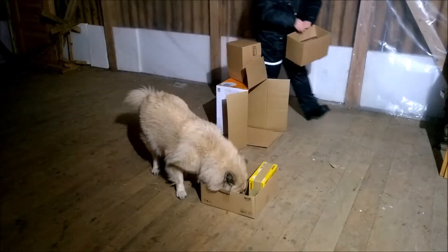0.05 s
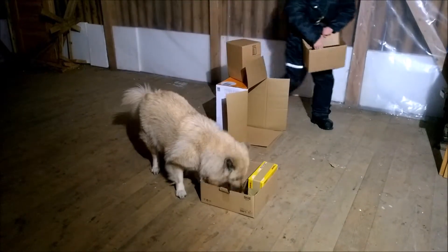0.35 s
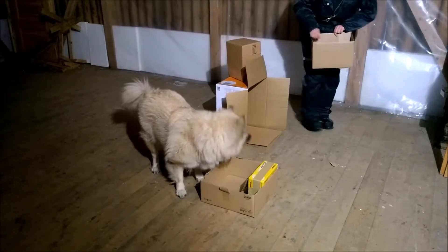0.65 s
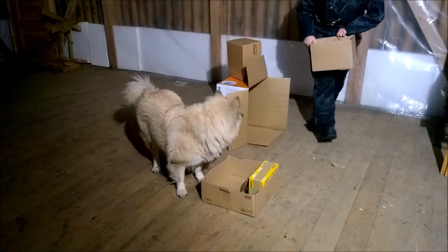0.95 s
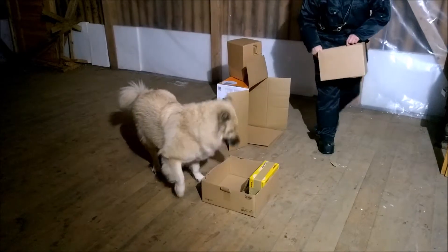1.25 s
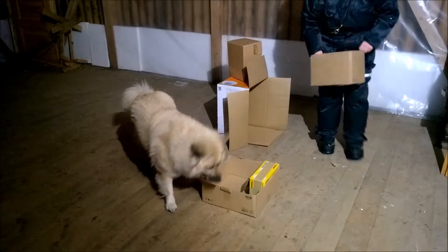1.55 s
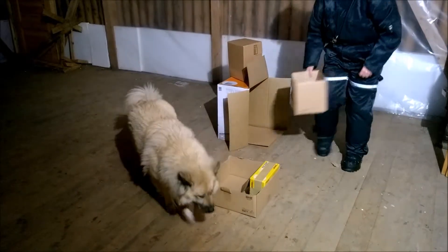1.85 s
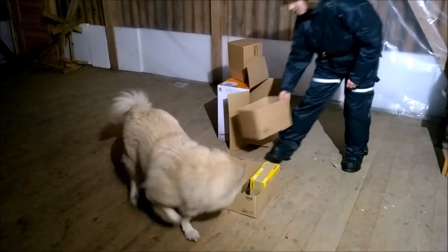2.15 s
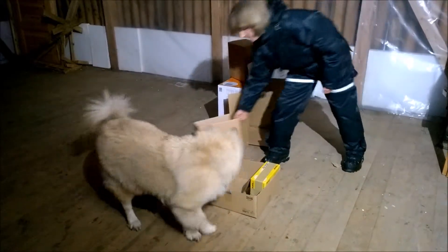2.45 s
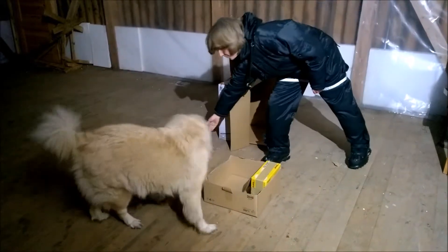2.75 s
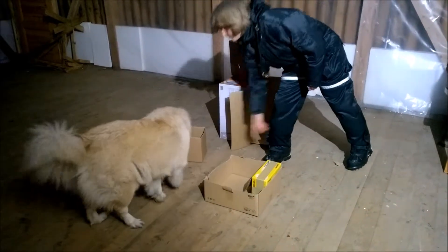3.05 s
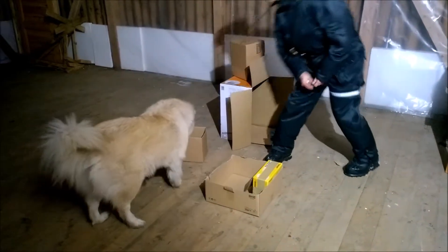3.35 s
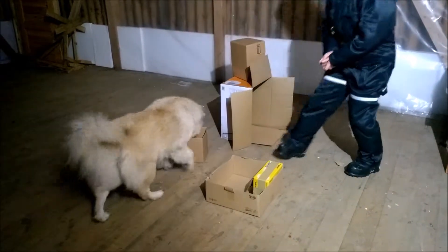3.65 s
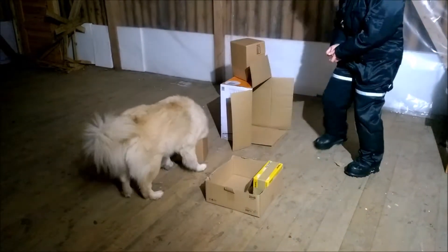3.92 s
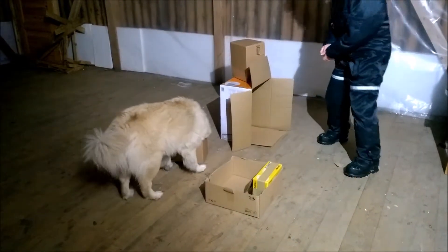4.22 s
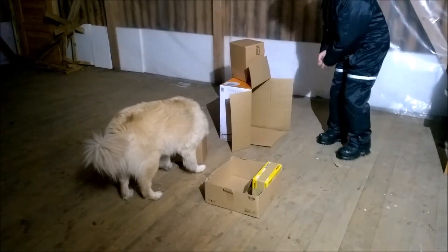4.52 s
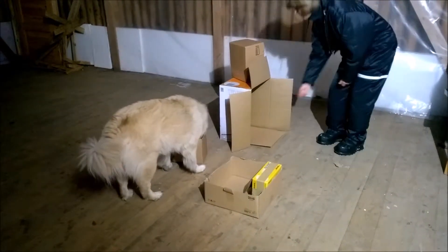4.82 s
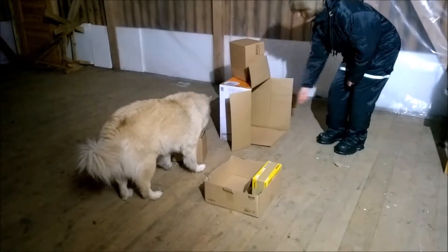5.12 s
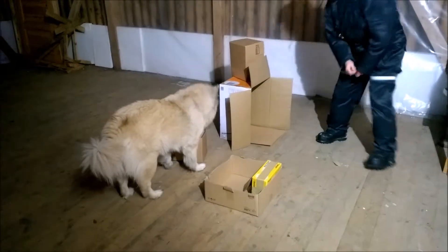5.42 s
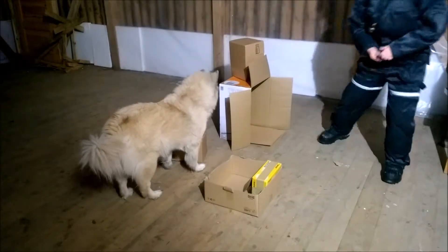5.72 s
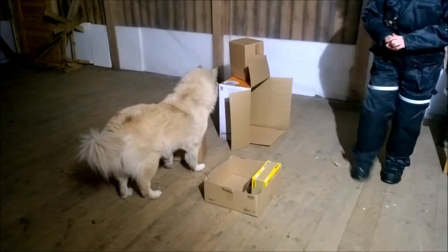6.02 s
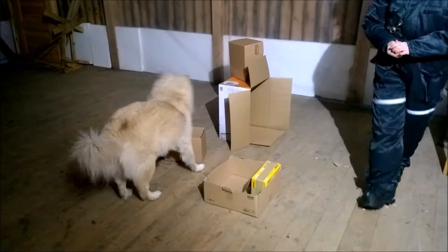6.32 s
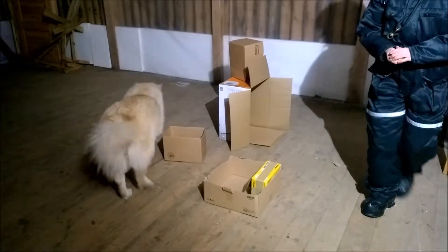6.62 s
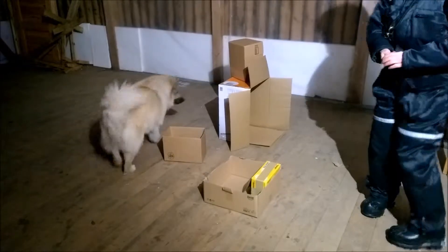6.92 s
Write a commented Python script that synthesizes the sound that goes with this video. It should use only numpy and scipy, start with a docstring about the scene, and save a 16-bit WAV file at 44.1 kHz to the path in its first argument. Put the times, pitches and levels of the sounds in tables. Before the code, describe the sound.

Boots thud on barn planks as a cardboard box bumps, slaps down and skids, with nylon swishing and a dog padding softly.

```python
"""Boots boom on the plank floor of a barn, setting planks and joists swinging, while soles scuff
and nylon work clothes swish. The walker bumps a cardboard box against a stack and tosses it:
it slaps down and skids, sticking and slipping over grit. A dog pads about and nudges it,
claws skating on the cardboard. The wooden room answers every knock."""
import sys
import numpy as np
from scipy import signal
from scipy.fft import rfft, irfft
from scipy.io import wavfile

SR = 44100
rng = np.random.default_rng(int(sys.argv[2]) if len(sys.argv) > 2 else 0)


def output_pcm(signal):
    """Save a mono or channel-first signal as 16-bit PCM at the path in sys.argv[1].

    Samples are clipped to [-1, 1] before scaling.
    """
    pcm = np.clip(np.atleast_2d(signal).T, -1, 1) * 32767
    wavfile.write(sys.argv[1], SR, np.round(pcm).astype(np.int16))


N = 316197
HZ = np.fft.rfftfreq(N, 1 / SR)
T = np.arange(N) / SR
RING = T[:SR]  # the second that follows a blow


def amp(db):
    """Decibels to gain."""
    return 10 ** (np.asarray(db) / 20)


def unit(x):
    """Scales to rms 1."""
    return x / np.sqrt(np.mean(x ** 2) + 1e-20)


def read(points, hz):
    """Reads a curve along a log-frequency axis."""
    f, value = np.transpose(points)
    return np.interp(np.log(hz + 1), np.log(f + 1), value)


def add(mix, s, sound):
    """Lays a sound into the mix at s seconds."""
    part = mix[max(round(s * SR), 0):][:len(sound)]
    part += sound[:len(part)]


def tilt(x, spectrum):
    """A gentle EQ curve."""
    return irfft(rfft(x) * amp(read(spectrum, HZ)), N)


def colour(x, spectrum, size=4096):
    """Causal EQ of energy 1 that keeps attacks sharp."""
    log_gain = np.log(amp(read(spectrum, abs(np.fft.fftfreq(size, 1 / SR)))))
    taps = np.fft.ifft(np.exp(np.conj(signal.hilbert(log_gain)))).real[:size // 2]
    return signal.oaconvolve(x, taps / np.linalg.norm(taps))[:N]


def bandpass(x, edges_hz):
    """Keeps the band between two edges."""
    return signal.sosfilt(signal.butter(2, edges_hz, "bandpass", fs=SR, output="sos"), x)


def grains(per_s, spread_db):
    """Random clicks of uneven size, rms 1."""
    size = amp(spread_db * np.minimum(rng.exponential(1, N), 4))
    return unit(size * rng.choice([-1., 1.], N) * (rng.random(N) < per_s / SR))


def drift(hz):
    """Smooth random wander up to about hz, rms 1."""
    return unit(irfft(rfft(rng.standard_normal(N)) / (1 + (HZ / hz) ** 4), N))


def swell(rise, t60):
    """Envelope of a blow: a smooth attack, then a steady decay."""
    attack = np.sin(np.pi / 2 * np.minimum(RING / rise, 1)) ** 2
    return attack * amp(-60 * np.maximum(RING - rise, 0) / t60)


def mode(hz, rise, t60):
    """One dying vibration."""
    return np.sqrt(2) * swell(rise, t60) * np.sin(2 * np.pi * hz * RING)


def stroke(centre_s, half_s):
    """Envelope of a rub that speeds up and slows down."""
    return np.exp(-np.minimum(((T - centre_s) / half_s) ** 2, 20))


# Colour of the still air: freq_hz, level_db
AIR_EQ = [(12, -31), (20, -4), (40, -5.5), (144, -20.5), (232, -19), (259, -21.5), (439, -28.5),
          (788, -31.5), (1580, -38), (1720, -38), (1870, -39.5), (2840, -40), (15500, -56)]
# How alike its two sides are: freq_hz, likeness (0-1)
AIR_LIKENESS = [(30, 0.84), (200, 0.52), (500, 1), (1200, 0.12), (15000, 0.11)]
def room_tone(level_db=-50):
    """The quiet of the barn: a restless rumble, much alike on both sides, under a thin, wide hiss."""
    right, apart = rfft(rng.standard_normal((2, N)))
    likeness = np.clip(read(AIR_LIKENESS, HZ), 0, 1)
    left = likeness * right + np.sqrt(1 - likeness ** 2) * apart
    pair = irfft(np.array([left, right]) * amp(read(AIR_EQ, HZ)), N)
    return amp(level_db) * unit(pair) * amp(0.35 * drift(hz=3.8))


# Decay of the wooden room: freq_hz, t60_s
BARN_DECAY = [(60, 5), (250, 0.4), (1000, 0.92), (4000, 0.36), (8000, 0.4), (15000, 0.18)]
def echoes(per_s=3000):
    """A random stereo reverb tail of energy 1 a side, each band dying at its own speed."""
    taps = rng.choice([-1., 1.], (2, SR)) * (rng.random((2, SR)) < per_s / SR)
    taps *= np.clip((RING - .001) / 0.003, 0, 1)
    taps *= 1 + 4.0 * np.exp(-RING / 0.069)  # early echoes are the strongest
    hz, t, bands = signal.stft(taps, SR, nperseg=256)
    t60 = read(BARN_DECAY, hz)[:, None]
    tail = signal.istft(bands * amp(-60 * t / t60) / np.sqrt(t60), SR, nperseg=256)[1]
    return tail / np.linalg.norm(tail, axis=1, keepdims=True)


# EQ of the reverb send: freq_hz, gain_db
SEND_EQ = [(30, -2), (110, -10.5), (250, -4.5), (600, 1.5), (1500, -2.5), (5000, -0.5), (14000, 3.5)]
# Direct sound on the shaded left side: freq_hz, gain_db
SHADE_EQ = [(30, -6), (300, -1.5), (900, 2), (2000, -6.5), (15000, 1.5)]
def barn(direct, send, lag_samples=8, shift_hz=3.3):
    """Direct sound reaches the left early but shaded; two tails crossfade, as if things moved about."""
    sent = tilt(send, SEND_EQ)
    turn = 2 * np.pi * shift_hz * T
    wet = sum(signal.oaconvolve((sent * share)[None], echoes(), axes=1)[:, :N]
              for share in (np.cos(turn), np.sin(turn)))
    left = amp(0.5) * tilt(direct, SHADE_EQ)
    right = np.pad(direct, (lag_samples, 0))[:N]
    return np.array([left, right]) + wet


# Nylon brushing past itself: centre_s, half_length_s, level_db
NYLON_SWISHES = [(.49, 0.13, -57), (0.734, 0.023, -56), (0.871, 0.087, -56), (1.147, 0.017, -49.5),
                 (1.286, 0.068, -52), (1.664, 0.024, -51), (1.944, 0.053, -52), (2.187, 0.047, -56),
                 (2.676, 0.04, -54), (3.068, 0.024, -50), (4.206, 0.033, -58.5), (4.395, 0.022, -63),
                 (6.686, 0.079, -56), (7.01, .07, -55)]
# Fader ride of the jacket's rustle: time_s, level_db
RUSTLE_RIDE = [(0, -58), (.45, -61.5), (1.4, -62), (1.58, -59.5), (3.5, -61.5), (3.9, -73), (4.12, -64),
               (5.1, -71), (5.3, -64), (5.9, -63.5), (6.2, -56.5), (7.17, -61.5)]
# Colours of swish and jacket: freq_hz, level_db
SWISH_EQ = [(1000, -36), (3000, 1), (4600, 4.5), (5700, 0), (7500, 3), (11500, -2), (13500, -7.5),
            (16000, -19)]
JACKET_EQ = [(300, 2.5), (900, -2), (2700, 4), (3500, -0.5), (4600, 3.5), (5700, -5), (8000, -11.5),
             (12000, -17), (16000, -56)]
def clothes():
    """Fine grains from woven nylon: bright swishes at the strides over the jacket's soft rustle."""
    legs, sleeves = (grains(per_s=16000, spread_db=-0.5) * amp(2.0 * drift(hz=27)) for _ in range(2))
    strides = sum(amp(db) * stroke(s, half) for s, half, db in NYLON_SWISHES)
    rustle = amp(np.interp(T, *np.transpose(RUSTLE_RIDE)))
    return colour(legs * strides, SWISH_EQ) + amp(-0.5) * colour(sleeves * rustle, JACKET_EQ)


# Claw scratches: start_s, decay_s, level_db
SCRATCHES = [(6.449, .006, -53), (6.462, .006, -40.5), (6.468, 0.012, -50)]
# Their sheen: freq_hz, level_db
CLAW_EQ = [(3000, -25), (8000, -27), (11000, 4), (14500, 0), (16000, -5)]
def claws():
    """The dog's claws skate on cardboard in thin, very bright scratches."""
    level = np.zeros(N)
    for s, decay, db in SCRATCHES:
        add(level, s, amp(db) * np.exp(-RING / decay))
    return colour(level * rng.standard_normal(N), CLAW_EQ)


# Soles and paws dragging: centre_s, half_length_s, level_db, rasp_hz, rasp_share (0-1)
DRAGS = [(.225, 0.023, -50.5, 1450, 0.6), (.528, 0.023, -45.5, 430, 0.99), (.61, 0.044, -59, 2780, 0.9),
         (.747, 0.021, -53.5, 1100, 0.65), (.836, 0.083, -58, 1600, 0.18),
         (1.237, 0.077, -51.5, 1450, 0.58), (1.305, 0.081, -52.5, 4340, 0.98),
         (1.665, 0.028, -45.5, 905, 0.84), (2.21, 0.093, -55, 864, 0.7), (2.668, 0.09, -58, 3850, 0.5),
         (3.154, 0.016, -52, 3100, 0.98), (3.635, 0.031, -50.5, 2420, 0.6), (3.75, 0.071, -60, 1090, 0.52),
         (4.058, 0.035, -59.5, 1110, 0.43), (5.51, 0.029, -59, 2900, 0.1), (4.695, 0.049, -62, 2500, 0.05),
         (6.21, 0.1, -61, 1100, 0.6), (6.457, 0.02, -48.5, 1680, 0.05), (6.555, .031, -59.5, 1110, 1),
         (6.716, 0.17, -60.5, 2600, 0.58), (6.837, .03, -58, 2400, 0.33), (6.955, 0.043, -59, 860, 0.5)]
# Colour of the broad rub: freq_hz, level_db
RUB_EQ = [(150, -16.5), (400, 1.5), (900, 1), (1800, -0.5), (3000, -4), (3600, -1), (4600, -4.5),
          (5600, -16), (8000, -19.5), (15000, -52)]
def scuffs(rasp_q=3.2, sole_half_s=0.094, sole_rasp_hz=480, sole_share=0.23):
    """Coarse grains from drags on dusty wood, each part broad rub, part its own narrow rasp."""
    # every sole also drags as it comes down, more so under weight
    soles = [(s + roll, sole_half_s, -37 + 0.77 * sole_db, sole_rasp_hz, sole_share)
             for s, roll, _, sole_db, *_ in BOOT_STEPS]
    dust, catches = (grains(per_s=5000, spread_db=1.0) * amp(4.2 * drift(hz=55)) for _ in range(2))
    rub, rasps = np.zeros((2, N))
    for s, half, db, hz, share in [*DRAGS, *soles]:
        level = amp(db) * stroke(s, half)
        edges_hz = hz * np.exp(np.array([-.5, .5]) / rasp_q)
        rub += np.sqrt(1 - share) * level
        rasps += np.sqrt(share) * level * unit(bandpass(catches, edges_hz))
    return rasps + colour(dust * rub, RUB_EQ)


# How each lands on the floor: rise_s, sway_db, overtone_db, thud_db
HEEL, SOLE, PAW = (.008, -15.5, -5, -5.5), (.016, 0, -14, -2.5), (.012, -9, -14.5, 0)
# Soft paw falls and shifts of weight: start_s, level_db, pitch_hz, thud_db
PAW_FALLS = [(0.031, -50, 71, -4), (0.497, -50.5, 150.7, 4.5), (.78, -58, 71.4, 12.5),
             (1.449, -50.5, 76.5, -6), (1.999, -38, 62.6, -11), (3.2, -46.5, 58.8, -11),
             (4.059, -58.5, 150.7, 6.5), (5.185, -50.5, 158, 4.5), (6.745, -48.5, 108.2, -5),
             (7.104, -49, 98.5, -10)]
# Boots, heel then sole: start_s, roll_s, heel_db, sole_db, pitch_hz, sway_db, brightness_db, thud_db
BOOT_STEPS = [(.143, 0.14, -37, -45, 79, -46, 2, 4.5), (1.002, 0.16, -33, -36.5, 70.3, -33, -6.5, 1.5),
              (1.632, 0.15, -45, -40, 69.4, -28, 14, 7), (2.129, 0.123, -54, -39, 65, -25, -5, 4.5),
              (2.351, .183, -23.5, -39.5, 83.7, -29.5, -12, -6.5),
              (3.336, 0.16, -42, -42.5, 77.3, -36, 7.5, 4.5), (4.336, 0.15, -51.5, -71, 74.8, -70, -8, 4),
              (4.648, .12, -47.5, -67, 89, -57, -14, 3), (5.502, 0.11, -43.5, -38.5, 62.7, -31.5, 1.5, 6),
              (6.316, .167, -37, -37.5, 53.8, -29, -10, -2.5), (6.878, 0.1, -47, -45, 76.8, -40.5, -1, 1)]
# Colour of the floor's dull thud: freq_hz, level_db
THUD_EQ = [(25, -2.5), (50, -5), (100, 2.5), (170, -2.5), (280, -12.5), (450, -22), (900, -30.5),
           (3000, -103)]
def footsteps(joist_hz=25.7, plank_t60=0.52, overtone_ratio=2.1):
    """Each footfall sways the joists, rings the plank under it and thuds through its neighbours."""
    falls = [(s, db, hz, db, 0, dull_db, PAW) for s, db, hz, dull_db in PAW_FALLS]
    for s, roll, heel_db, sole_db, *plank in BOOT_STEPS:
        falls += [(s, heel_db, *plank, HEEL), (s + roll, sole_db, *plank, SOLE)]
    rings, thuds = np.zeros((2, N))
    for s, db, hz, sway_db, bright_db, dull_db, touch in falls:
        rise, give_db, overtone_db, thud_db = touch
        overtone = amp(overtone_db + bright_db) * mode(overtone_ratio * hz, rise, plank_t60)
        ring = amp(db) * (mode(hz, rise, plank_t60) + overtone)
        sway = amp(sway_db + give_db) * mode(joist_hz, 2 * rise, t60=0.48)
        add(rings, s, ring + sway)
        add(thuds, s, amp(db + thud_db + dull_db) * swell(rise, t60=0.64))
    return rings + colour(thuds * rng.standard_normal(N), THUD_EQ)


def blend(soft, hard, hardness):
    """Crossfades from the soft value to the hard one."""
    return soft + (hard - soft) * hardness


# Hits on cardboard and wood: start_s, force_db, pitch_hz, hardness (0-1), tick_db
# The box bumps the stack at 2.27 s and slaps down at 2.82 s; something small drops into a box at 5.18 s.
HITS = [(0.028, -68.5, 517, 1, -57), (0.238, -41.5, 407, 0.53, -49.5), (0.499, -51, 438, 0, -74),
        (0.716, -52, 476, 0.63, -69), (1.235, -48.5, 440, .25, -64), (1.63, -51.5, 940, 0.82, -70),
        (2.087, -57, 610, 0.99, -73), (2.236, -49.5, 604, 0.36, -70), (2.2683, -30.5, 1177, 0.83, -64),
        (2.276, -32, 805, 0.34, -65), (2.291, -32, 875, 0.49, -57), (2.312, -43, 375, 0.13, -58),
        (2.3398, -35, 790, 0.72, -66), (2.361, -38.5, 366, 0.55, -71), (2.51, -51, 604, 0.77, -69),
        (2.5737, -41.5, 730, 1, -39.5), (2.587, -42, 810, 0.6, -50.5), (2.822, -22.5, 273, 0.51, -22.5),
        (2.992, -49, 478, 0.4, -35), (3.559, -40, 358, 0.63, -60), (3.624, -50, 398, 0.9, -76),
        (5.176, -40, 1054, 0.46, -48), (5.199, -42.5, 402, 0.16, -69), (5.22, -50, 293, 0, -78),
        (5.624, -61, 326, .05, -71), (6.466, -36.5, 767, 0.4, -48.5), (6.48, -42.5, 351, 0, -70)]
# Colours of the air behind the panel, the fibre crack and the grit tick: freq_hz, level_db
HOLLOW_EQ = [(90, -24.5), (180, 4.5), (330, 3.5), (520, -6), (620, -1), (790, -4.5), (1100, -6),
             (1600, -14.5), (4000, -55.5)]
CRACK_EQ = [(300, -34), (900, -25), (1300, 3.5), (2200, 5), (3000, 2.5), (3600, -3.5), (4500, 2.5),
            (5500, -11.5), (8000, -20.5), (15000, -45)]
TICK_EQ = [(1500, -19), (4500, 8.5), (5800, 7), (8000, 9.5), (11500, 3.5), (14000, -4), (16000, -5)]
def knocks(soft_contact_s=.021, hard_contact_s=0.0029):
    """A short crush of fibres gives crack and tick; the panel and the hollow behind it ring on."""
    panels, hollow, crack, tick = np.zeros((4, N))
    for s, db, hz, hardness, tick_db in HITS:
        # a harder knock is shorter, cracks more and rings the panel less
        decay = np.exp(blend(np.log(soft_contact_s), np.log(hard_contact_s), hardness))
        crack_db = db + blend(-17.5, 14.5, hardness)
        panel_db = db + blend(6.5, -9, hardness)
        press = 1 - np.exp(-RING / (0.15 * decay))  # a longer contact also builds up more slowly
        contact = press * np.exp(-RING / decay)
        ring = mode(hz, rise=0.0017, t60=0.14) + amp(-7.5) * mode(1.794 * hz, rise=0.0019, t60=0.014)
        add(panels, s, amp(panel_db) * ring)
        add(hollow, s, amp(db - 1.5) * press * np.exp(-RING / (decay + 0.01)))
        add(crack, s, amp(crack_db) * contact)
        add(tick, s, amp(tick_db) * contact)
    fibres = grains(per_s=12000, spread_db=4.5)
    texture = colour(hollow * rng.standard_normal(N), HOLLOW_EQ)
    texture += colour(crack * fibres, CRACK_EQ)
    texture += colour(tick * rng.standard_normal(N), TICK_EQ)
    return panels + amp(2.5) * texture


def slide(length, rise, stop_t60, slowing_db_per_s=30):
    """Envelope of a slide: it takes hold, weakens as it slows, then stops."""
    stop = amp(-60 * np.maximum(RING - length, 0) / stop_t60)
    return np.minimum(RING / rise, 1) * amp(-slowing_db_per_s * RING) * stop


# Resonances of the sliding box: pitch_hz, width_hz, level_db
BOX_MODES = [(81, 25, 0.5), (121.3, 18, 5.5), (157, 65, -0.5), (270, 29, -1.5), (323, 24, -3),
             (368, 42, -6), (455.5, 27, -3), (519, 25, -9), (540, 35, -12.5), (737, 33, -15)]
def box_body(drive):
    """Shaken cardboard panels drum; neighbouring modes swing in opposite directions."""
    body = np.zeros(SR)
    for k, (hz, width, db) in enumerate(BOX_MODES):
        decay = np.exp(-np.pi * width * RING)
        body += (-1) ** k * amp(db) * width * decay * np.cos(2 * np.pi * hz * RING)
    body = bandpass(body, [45, 900])
    return signal.oaconvolve(drive, body / np.linalg.norm(body))[:N]


# The box skids, then rocks on a little: start_s, length_s, judder_db, grit_db
SKIDS = [(2.72, 0.18, -23.5, -27), (2.955, 0.046, -37.5, -39)]
# Colour of the grit under its edge: freq_hz, level_db
GRIT_EQ = [(300, 16.5), (800, 8), (1400, 5.5), (2050, 8.5), (2500, 4.5), (3000, 10), (3500, 3), (4700, 7),
           (5500, -4.5), (7200, 1.5), (8200, -0.5), (10500, -0.5), (13000, -5), (16000, -15)]
def box_skid(plank_hz=112.8, slips_per_s=130):
    """The box booms on a plank, then sticks and slips: uneven jerks shake it while grit hisses."""
    judder, grit, boom = np.zeros((3, N))
    for s, length, judder_db, grit_db in SKIDS:
        add(judder, s, amp(judder_db) * slide(length, rise=0.0032, stop_t60=0.21))
        add(grit, s, amp(grit_db) * slide(length, rise=0.036, stop_t60=0.19))  # the edge bites late
        add(boom, s, amp(judder_db - 4.5) * swell(rise=.014, t60=0.53))
    plank = np.sqrt(2) * np.sin(2 * np.pi * plank_hz * T)
    thud = amp(-1) * colour(rng.standard_normal(N), THUD_EQ)
    slip_count = np.cumsum(slips_per_s * np.exp(.55 * drift(hz=160))) / SR
    jerks = unit(np.diff(np.floor(slip_count), prepend=0) * amp(3.6 * drift(hz=110)))
    drive = jerks - jerks.mean() + 1.19 * rng.standard_normal(N)
    spurts = 1 + 0.26 * np.exp(-(slip_count % 1) / 0.31)  # the hiss flares at each slip
    hiss = unit(grains(per_s=4900, spread_db=3.5) * spurts)
    return boom * (plank + thud) + box_body(drive * judder) + colour(hiss * grit, GRIT_EQ)


def scene():
    """Blows and friction sound through the barn, over its room tone."""
    blows = amp(3) * footsteps() + amp(0.5) * knocks()
    friction = amp(-1.5) * box_skid() + amp(2) * scuffs() + clothes() + amp(-5) * claws()
    send = amp(-1) * blows + amp(-1.5) * friction
    return barn(blows + friction, send) + room_tone()


# The weaker left microphone: freq_hz, gain_db
LEFT_MIC_EQ = [(30, -5), (150, -12), (400, -12), (750, -13), (1250, -9.5), (2000, -9), (3500, -13),
               (6000, -15), (9500, -14), (14000, -9.5)]
def record(dry):
    """A weak left microphone leans the image right; a steep low-pass trims the very top."""
    pair = np.array([tilt(dry[0], LEFT_MIC_EQ), dry[1]])
    lowpass = signal.firwin(511, cutoff=15650, window=("kaiser", 9), fs=SR)
    return signal.oaconvolve(pair, lowpass[None], "same")


dry = scene()
out = record(dry)
output_pcm(out)
```